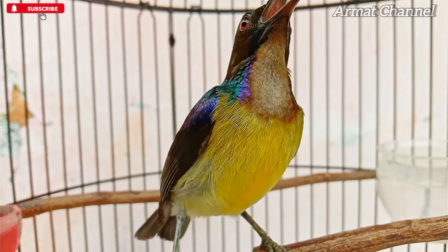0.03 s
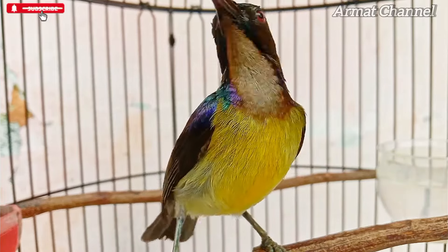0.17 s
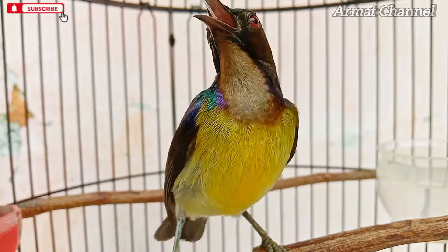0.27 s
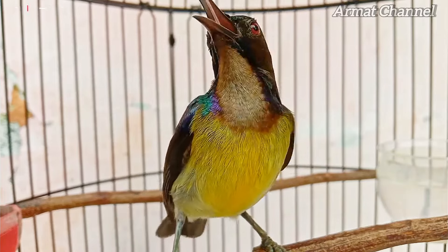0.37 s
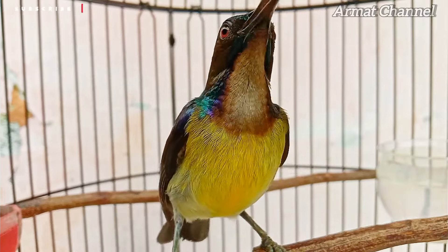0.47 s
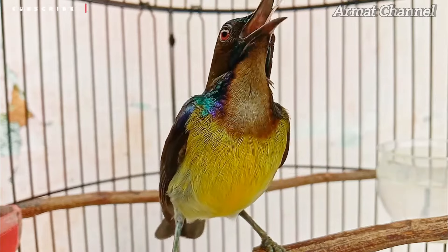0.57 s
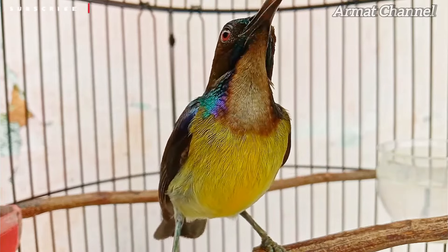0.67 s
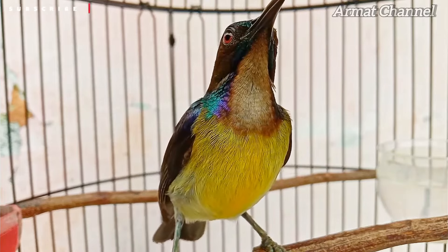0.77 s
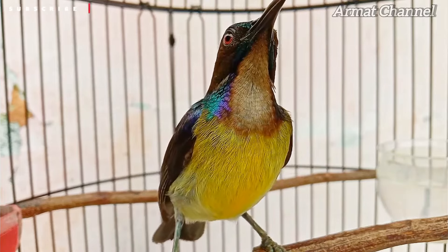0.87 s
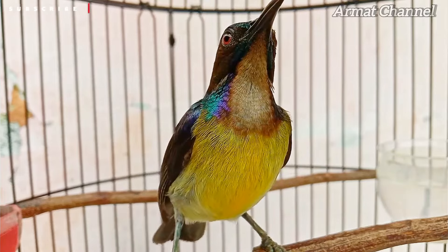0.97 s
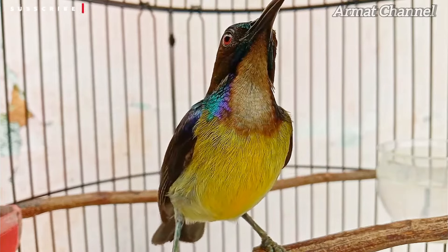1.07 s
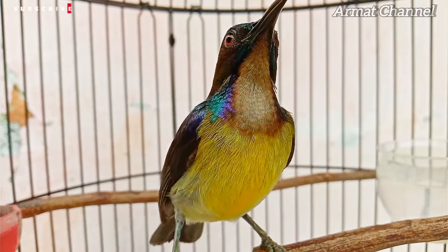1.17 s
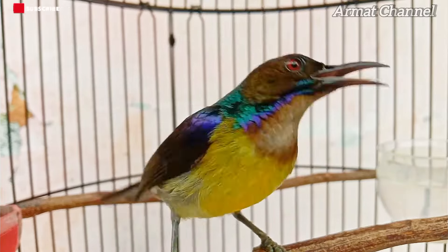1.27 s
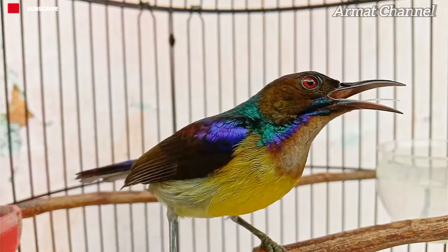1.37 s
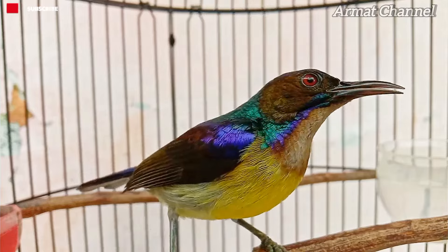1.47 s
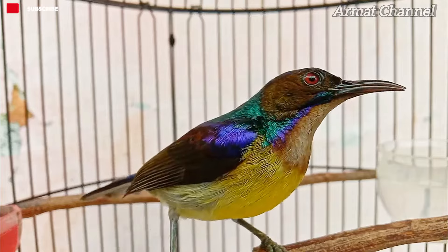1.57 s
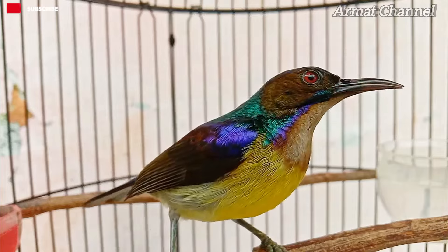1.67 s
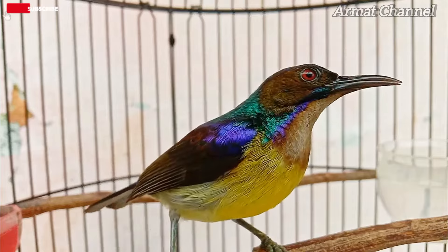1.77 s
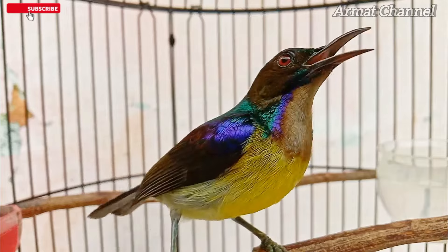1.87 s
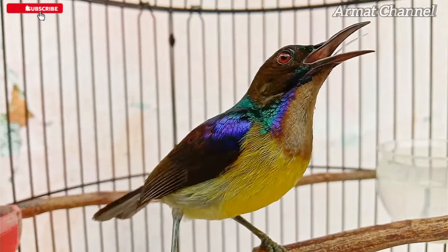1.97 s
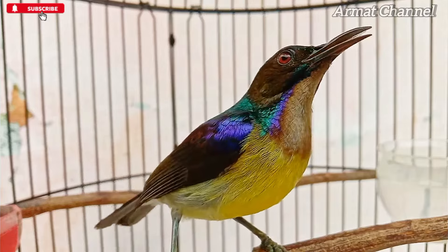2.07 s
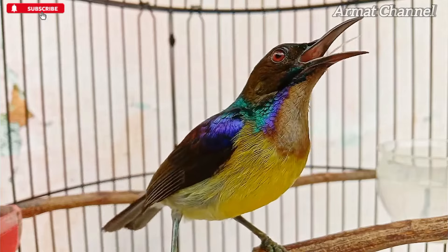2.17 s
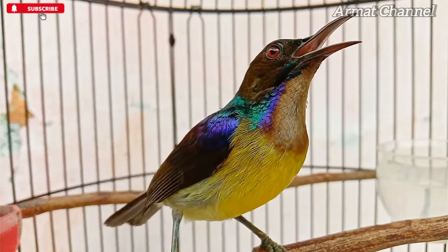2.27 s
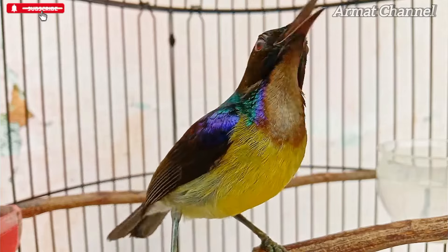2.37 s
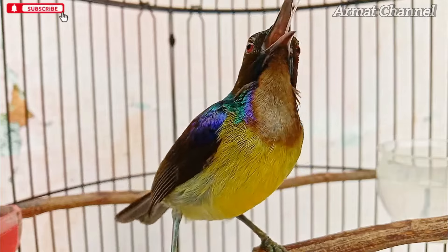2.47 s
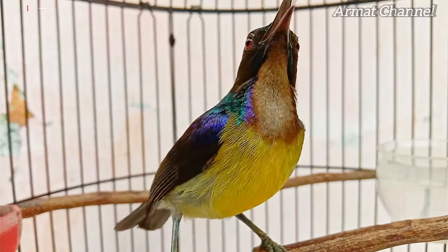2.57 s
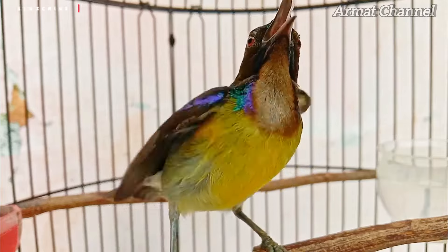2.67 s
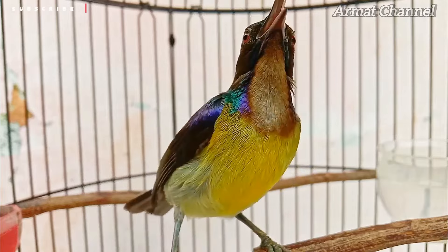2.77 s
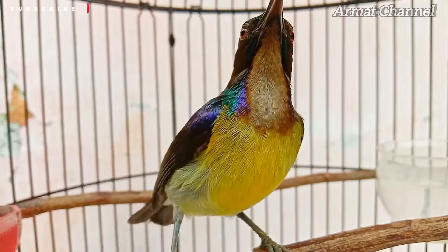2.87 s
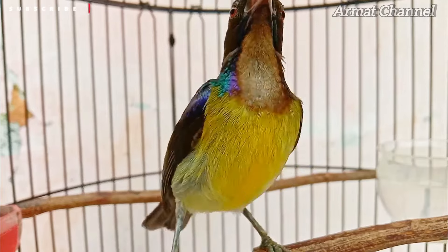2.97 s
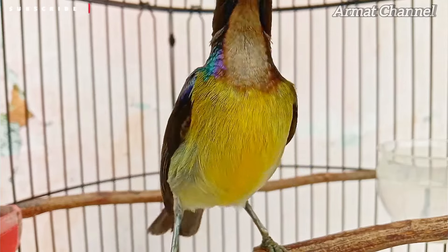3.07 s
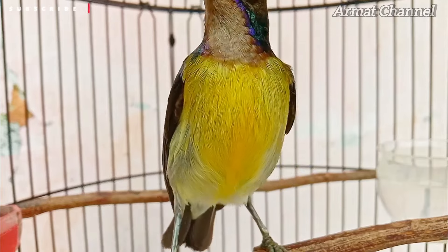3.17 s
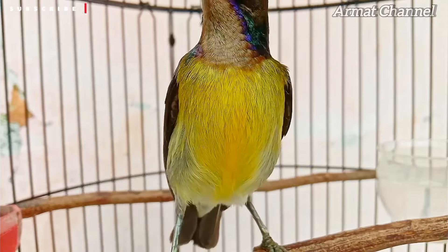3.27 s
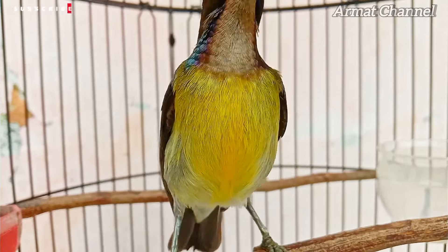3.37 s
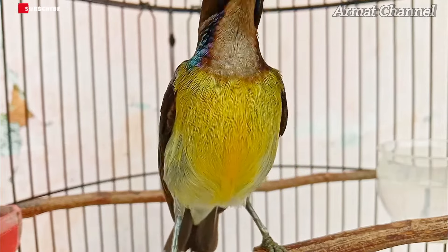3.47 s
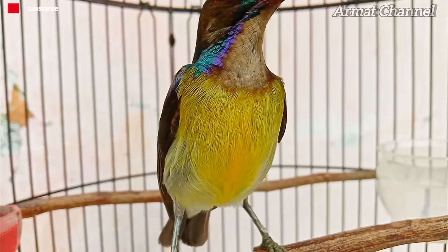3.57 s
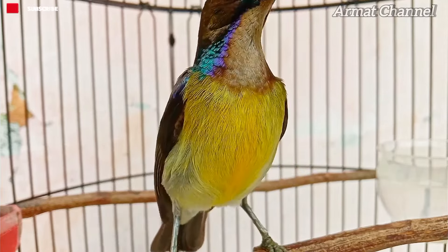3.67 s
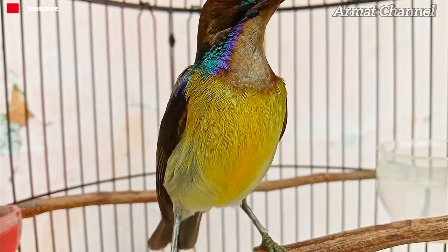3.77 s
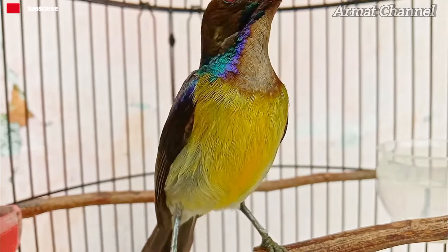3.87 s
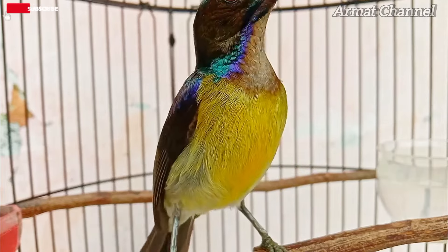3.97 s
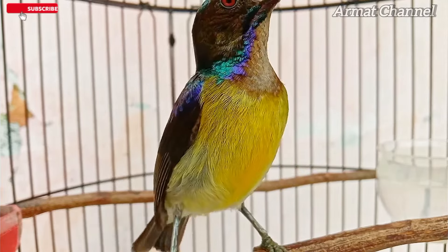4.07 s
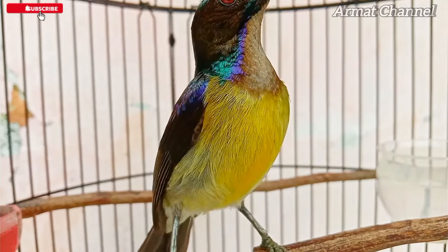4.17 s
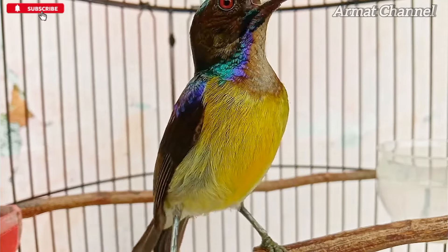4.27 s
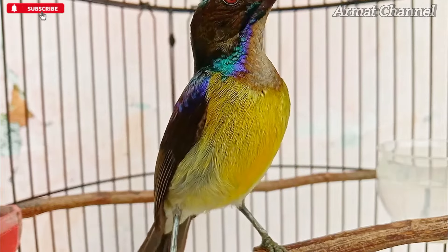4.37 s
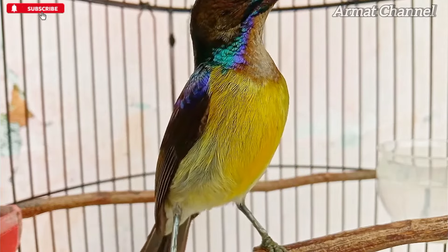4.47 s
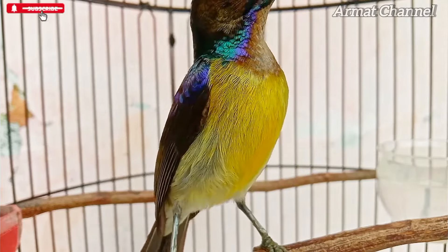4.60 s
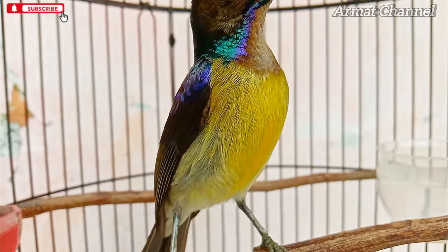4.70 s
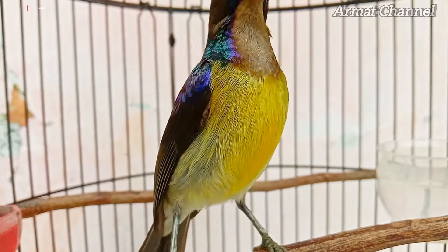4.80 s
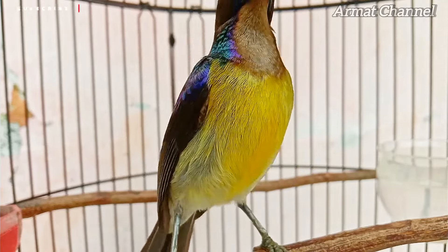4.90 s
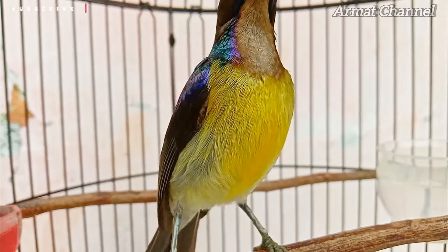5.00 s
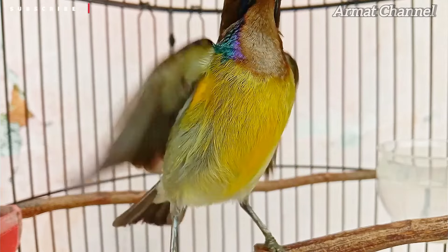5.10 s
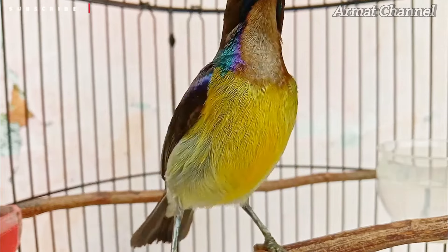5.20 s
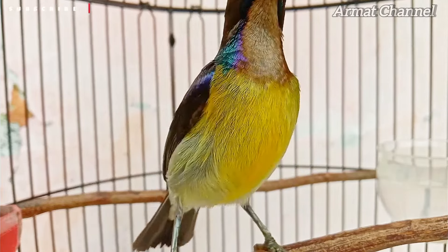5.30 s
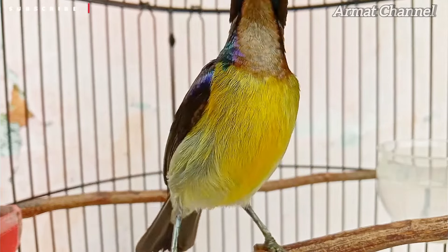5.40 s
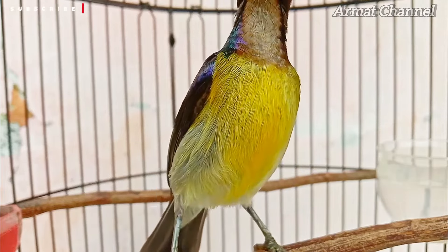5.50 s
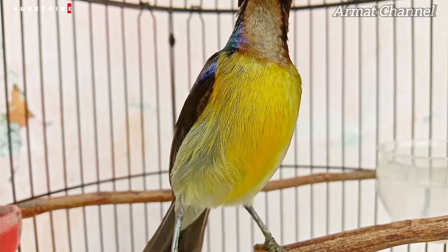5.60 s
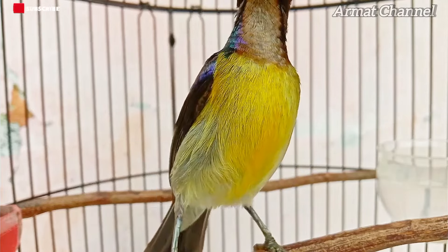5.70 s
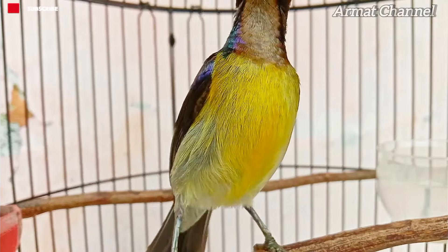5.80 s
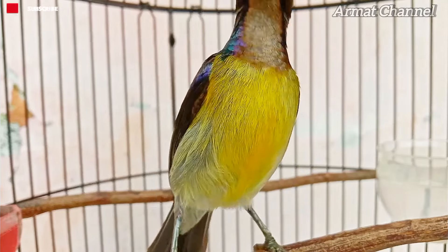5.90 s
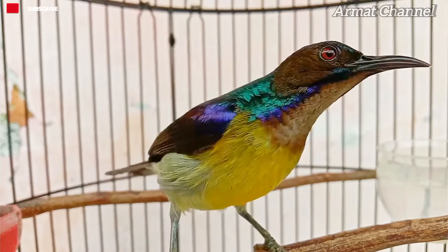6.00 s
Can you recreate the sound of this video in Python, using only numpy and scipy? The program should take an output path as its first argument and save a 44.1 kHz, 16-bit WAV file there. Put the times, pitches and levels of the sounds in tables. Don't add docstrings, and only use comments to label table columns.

```python
import sys
import numpy as np
from scipy import signal
from scipy.io import wavfile
from scipy.ndimage import uniform_filter1d, minimum_filter1d

SR = 44100
rng = np.random.default_rng(int(sys.argv[2]) if len(sys.argv) > 2 else 0)


def to_linear_factor(level_db):
    exponent = np.asarray(level_db, float) / 20
    return 10 ** exponent


def persist_wave(psi):
    counts = np.round(np.clip(psi, -1, 1) * 32767).astype(np.int16)
    wavfile.write(sys.argv[1], SR, np.atleast_2d(counts).T)


N = 266584


def evened(x):
    return x / np.sqrt(np.mean(x ** 2) + 1e-20)


def read(points, hz):
    f, value = np.transpose(points)
    return np.interp(np.log(hz + 1), np.log(f + 1), value)


def add(mix, s, sound):
    at = round(s * SR)
    sound = sound[max(-at, 0):]
    part = mix[max(at, 0):][:len(sound)]
    part += sound[:len(part)]


def colour(x, points):
    gain_db = read(points, abs(np.fft.fftfreq(4096, 1 / SR)))
    log_spectrum = np.conj(signal.hilbert(np.log(to_linear_factor(gain_db))))
    taps = np.fft.ifft(np.exp(log_spectrum)).real[:2048]
    return signal.oaconvolve(x, taps)[:len(x)]


def wander(count, width_s):
    width = max(round(width_s * SR), 1)
    noise = rng.standard_normal(12000 + count // 12000 * 12000)
    smooth = uniform_filter1d(uniform_filter1d(noise, width), width)
    return evened(smooth)[:count]


def stack(hz, levels_db):
    turns = 2 * np.pi * np.cumsum(hz) / SR
    out = 0
    for k, db in enumerate(levels_db, 1):
        out = out + to_linear_factor(db) * np.cos(k * turns) * (k * hz < SR / 2.3)
    return out


def glide(row, levels_db, jitter, taper):
    s, length, from_hz, to_hz, db = row
    hz = np.geomspace(from_hz, to_hz, round(length * SR))
    hz = hz * (1 + jitter * wander(len(hz), 0.0044))
    return s, to_linear_factor(db) * stack(hz, levels_db) * signal.windows.tukey(len(hz), taper)


# time_s, level_db
EFFORT = [(0, -9.5), (1.3, -11.5), (2.3, -11), (2.9, -13), (3.15, -9), (3.6, -13), (4.3, -9.5), (5, -7.5)]


def breath_db(t):
    swell = -15 * np.maximum(1 - (t - t[0]) / .016, 0)
    fade = -13 * np.maximum(1 - (t[-1] - t) / .022, 0)
    flutter = 2 * wander(len(t), .01)
    return np.interp(t, *np.transpose(EFFORT)) + swell + fade + flutter


# time_s, pitch_hz, extra_effort_db
ARCHES = [
    [(0.133, 1125, 10.5), (0.147, 2390, -0.5), (0.169, 2517, -2.5), (0.185, 2864, -8), (0.197, 3066, -4),
     (0.217, 2953, -5.5), (0.271, 2477, -3.5), (0.281, 2285, -7.5), (0.3, 1124, 5)],
    [(0.406, 990, 5), (0.42, 1700, -10), (0.432, 2250, -3.5), (0.453, 2677, -4.5), (0.468, 3125, -2),
     (0.5, 2765, -5), (0.534, 2521, -1), (0.55, 2215, -12), (0.57, 1144, 8)],
    [(1.193, 1134, 18), (1.207, 2070, -8), (1.231, 2450, -4), (1.249, 2670, -1.5), (1.265, 2890, -7.5),
     (1.301, 2560, 2), (1.333, 2237, -2), (1.339, 2090, -6.5), (1.358, 1170, -11)],
    [(1.774, 1133, 12), (1.788, 2303, -7.5), (1.812, 2533, 0.5), (1.824, 2874, -5), (1.842, 2906, -3),
     (1.902, 2510, 0), (1.916, 2360, -9), (1.922, 2330, -1), (1.942, 1150, 3)],
    [(2.033, 1132, 9), (2.047, 2350, -4), (2.075, 2740, -3.5), (2.085, 2920, -2), (2.103, 3173, 0.5),
     (2.145, 2760, -0.5), (2.181, 2583, -3), (2.197, 2307, 2), (2.215, 1080, 4.5)],
    [(2.282, 1136, 18), (2.296, 2260, -9.5), (2.324, 2780, 2), (2.354, 3094, -5), (2.37, 3040, -3),
     (2.4, 2770, -1.5), (2.42, 2680, -3), (2.45, 2334, 2.5), (2.468, 1150, 1.5)],
    [(2.541, 1131, 18.5), (2.555, 2375, -7), (2.58, 2567, -5), (2.601, 2993, 1), (2.616, 3224, -2.5),
     (2.64, 2796, 5.5), (2.685, 2524, 0), (2.697, 2250, 3.5), (2.715, 1104, 6)],
    [(2.811, 1153, 22.5), (2.825, 2363, -5), (2.853, 2664, 4.5), (2.865, 2974, 0.5), (2.893, 3124, -2.5),
     (2.913, 2757, 11.5), (2.943, 2580, 3), (2.967, 2233, 4), (2.985, 1107, 10)],
    [(3.078, 1135, 23.5), (3.092, 2235, -10), (3.122, 2673, -8), (3.14, 3150, -3.5), (3.152, 3202, 0.5),
     (3.176, 2740, -8.5), (3.206, 2448, -1.5), (3.216, 2258, -4.5), (3.235, 1123, -16)],
    [(3.396, 1194, 12.5), (3.41, 2405, -5.5), (3.438, 2710, -3.5), (3.452, 3178, 0.5), (3.47, 3157, 0.5),
     (3.504, 2730, 2), (3.536, 2480, -1), (3.55, 2250, 4), (3.568, 1174, -2.5)],
    [(3.636, 1207, 12), (3.65, 2448, -3), (3.675, 2755, 0), (3.695, 3535, -3), (3.715, 3280, -1.5),
     (3.745, 2794, 0.5), (3.782, 2510, 1.5), (3.794, 2260, 3.5), (3.812, 1204, 5)],
    [(3.886, 1152, 15.5), (3.9, 2460, -3), (3.918, 2660, -2.5), (3.932, 3510, -4.5), (3.946, 3750, 1),
     (3.986, 2787, -3), (4.02, 2520, -2), (4.04, 2195, -5), (4.058, 1100, -3)],]
# time_s, pitch_hz, extra_effort_db
SLURS = [
    [(-.03, 2678, 5), (.015, 2656, -1), (.028, 2480, -2.5), (.038, 2230, -3.5), (.058, 1080, -1)],
    [(4.125, 1270, 16.5), (4.141, 2524, -6.5), (4.156, 2670, -3.5), (4.18, 3890, -4.5), (4.189, 3970, 5),
     (4.211, 3520, -5.5), (4.228, 2270, -3), (4.252, 1096, 3)],
    [(4.438, 1198, 16), (4.462, 2800, -12), (4.475, 4266, -6.5), (4.488, 4843, -2), (4.505, 4330, -1),
     (4.52, 2250, -10), (4.54, 1083, 8.5)],
    [(4.938, 1024, 9), (4.956, 2275, -6), (4.968, 2520, -9.5), (4.98, 4320, -9.5), (4.989, 4650, -3),
     (5.009, 4050, -6), (5.022, 2094, -11), (5.036, 1090, 11)],
]
# time_s, pitch_hz, effort_db
WHISTLES = [
    [(1.754, 2900, 4), (1.759, 3585, -27.5), (1.763, 7800, -7), (1.771, 7420, 0), (1.785, 6240, -21),
     (1.794, 6340, -25), (1.807, 5000, -42)],
    [(4.31, 2310, -19), (4.319, 4370, -19), (4.329, 6930, -5), (4.337, 7180, -6.5), (4.352, 6860, -9),
     (4.364, 5910, -9), (4.368, 4800, -31.5), (4.379, 1470, -6.5)],
    [(4.606, 2200, -22), (4.615, 4370, -27), (4.626, 7550, -6), (4.637, 6520, -14.5), (4.65, 5590, -6),
     (4.689, 5967, -13.5), (4.698, 4520, -51)],
    [(4.79, 2220, -16), (4.799, 4180, -17), (4.806, 6550, -2), (4.815, 6580, -8.5), (4.829, 6920, -7.5),
     (4.838, 6180, -11.5), (4.845, 4780, -36.5), (4.854, 1650, -7.5)],
]


def notes():
    out = []
    labelled = [(rows, False) for rows in ARCHES + SLURS]
    labelled += [(rows, True) for rows in WHISTLES]
    for rows, whistle in labelled:
        s, hz, db = np.transpose(rows)
        t = np.arange(s[0], s[-1], 1 / SR)
        effort_db = np.interp(t, s, db)
        if not whistle:
            effort_db = effort_db + breath_db(t)
        out.append((t, np.interp(t, s, hz), effort_db, whistle))
    return out


OVERTONES_DB = [-1.5, -1.7, -7, -7.5, -4, -6, -13, -18.5, -38, -41.5]
# time_s, depth_db
BEAK_SHADOW = [(0, -2), (2.6, -3), (3, -16), (4.3, -20), (4.45, -2), (5, -2)]


def syrinx(t, hz, effort_db, whistle):
    count, rising, falling = len(t), t < t.mean(), t > t.mean()
    hz = uniform_filter1d(hz, round(.0047 * SR), mode="nearest")
    slack = np.clip(2 - 2 * hz / 2300, 0, 1)
    taut = np.clip(2 * hz / 3650 - 2, 0, 1)
    jitter = (0.0046 + .04 * slack) * wander(count, 0.00085)
    hz = hz * (1 + jitter + .005 * wander(count, .006))
    low = np.clip((2350 - hz) / 350, 0, 1)
    limp = low * falling
    onset = low * rising * (1 - slack)

    upper_db = 5 * wander(count, .004) - 10 * np.maximum(3100 - hz, 0) / 1000
    whistle_db = -20 * whistle * np.clip(5300 / hz * 10 - 10, 0, 1)
    over_db = -8 * taut - 13 * limp + whistle_db
    shadow_db = np.interp(t, *np.transpose(BEAK_SHADOW))
    levels_db = []
    for k, db in enumerate(OVERTONES_DB, 1):
        shaded_db = shadow_db * np.exp(-((k * hz - 9100) / 850) ** 2)
        levels_db.append(db + over_db * (k > 1) + shaded_db + upper_db * (k > 3))

    fray_db = np.clip((2650 - hz) / 200, 0, 1) * falling * (1 - limp) * (7 + 5 * wander(count, .004))
    tight = np.clip((hz - 2700) / 250, 0, 1)
    puffs_db = 4.5 * wander(count, .009) + 9 * onset - 8 * tight - 10 * whistle
    leak_db = -17 + puffs_db + fray_db + 11 * limp * (1 - slack)
    air = to_linear_factor(19 * slack) * rng.standard_normal(count)

    edges = np.minimum(1, np.minimum((t - t[0]) / .014, (t[-1] - t) / .007))
    effort = np.sqrt(2) * to_linear_factor(effort_db) * edges
    return effort * stack(hz, levels_db), effort * to_linear_factor(leak_db) * air, effort * to_linear_factor(-68) * air


# frequency_hz, gain_db
TRACT = [(1000, -25.5), (1600, -37.5), (2500, -29.5), (3500, -22.5), (4300, -11.5), (5000, -11.5),
         (6000, -0.5), (6400, -14.5), (6900, -18.5), (8000, -32), (9000, -35.5), (10500, -38), (13000, -41),
         (15000, -34)]
# frequency_hz, gain_db
CAGE = [(2300, -0.5), (2830, -3.5), (3200, 0), (3700, -0.5), (4400, 2), (5050, 0), (5350, 1), (5800, -0.5)]
# frequency_hz, gain_db
AIR = [(1500, -17), (3000, -6), (4000, 3), (4600, -4), (6500, -4.5), (7500, -1.5), (10000, -7)]
# start_s, length_s, from_hz, to_hz, level_db
RASPS = [
    (4.297, 0.023, 1150, 1950, -11.5),
    (4.593, 0.026, 1100, 2077, -15.5),
    (4.771, 0.028, 1150, 2092, -14.5),
]
# start_s, level_db
TICKS = [(.126, -50), (.399, -42), (1.188, -40), (2.028, -36), (2.536, -52), (2.805, -48), (3.072, -52),
         (3.627, -44), (4.118, -52), (4.432, -46), (4.768, -48), (4.932, -46)]
# frequency_hz, gain_db
WIRES = [(530, -22.5), (900, -33), (1180, 14), (1470, 6.5), (1950, 3), (3180, 5.5), (5120, 9),
         (11000, -11.5), (15500, -10.5)]


def bird():
    voice, breath, hiss, ticks = np.zeros((4, N))
    for t, hz, effort_db, whistle in notes():
        tone, leak, beak = syrinx(t, hz, effort_db, whistle)
        add(voice, t[0], tone)
        add(breath, t[0], leak)
        add(hiss, t[0], beak)
    for s, db in TICKS:
        add(ticks, s, to_linear_factor(db) * rng.standard_normal(30) * np.hanning(30))
    for row in RASPS:
        s, rasp = glide(row, OVERTONES_DB, .05, .9)
        add(breath, s, rasp * (1 + .85 * rng.standard_normal(len(rasp))))
        add(hiss, s, rasp * to_linear_factor(-46) * rng.standard_normal(len(rasp)))
    hiss = signal.lfilter(*signal.butter(3, 7500, "high", fs=SR), hiss)
    ticks = signal.lfilter(*signal.butter(3, 7000, fs=SR), ticks)
    sung = colour(colour(voice, CAGE) + colour(breath, AIR), TRACT)
    return to_linear_factor(10) * (sung + hiss + colour(ticks, WIRES))


# start_s, tick_db, thump_db
PERCH = [(0.3374, -43.5, -51), (0.3644, -47.5, -45), (0.7553, -56.5, -53), (0.807, -56, -54),
         (1.3, -42, -50), (1.499, -51.5, -44), (1.6442, -60.5, -67), (1.666, -52, -39), (1.675, -45.5, -58),
         (1.69, -45.5, -55), (1.7203, -40.5, -38.5), (1.7392, -54, -52), (2.4233, -53, -42),
         (2.4511, -52, -41), (3.138, -32, -33), (3.261, -41.5, -41), (3.27, -44, -34.5), (3.296, -51, -47),
         (3.322, -36.5, -37), (3.3593, -39, -41.5), (3.382, -39, -64), (3.4567, -42, -39),
         (3.5322, -42.5, -42), (5.219, -49.5, -50), (5.25, -51, -43.5), (5.2765, -47.5, -54),
         (5.306, -45.5, -40.5), (5.4653, -59, -52), (5.4844, -58.5, -50), (5.621, -58, -65)]


def perch():
    ticks, thumps, t = np.zeros(N), np.zeros(N), np.arange(3500) / SR
    tick_shape = np.minimum(t / 0.0016, 1) * (to_linear_factor(-60 * t / 0.023) + to_linear_factor(-20.5 - 60 * t / 0.3))
    thump_shape = np.minimum(t / .004, 1) * to_linear_factor(-60 * t / .09)
    for s, tick_db, thump_db in PERCH:
        add(ticks, s, to_linear_factor(tick_db + 5.5) * rng.standard_normal(len(t)) * tick_shape)
        add(thumps, s, to_linear_factor(thump_db + 11) * rng.standard_normal(len(t)) * thump_shape)
    thumps = signal.lfilter(*signal.butter(2, [110, 700], "band", fs=SR), thumps)
    return colour(ticks, WIRES) + thumps


# start_s, length_s, level_db
RUSTLES = [(0.289, 0.041, -55), (0.745, 0.09, -65.5), (1.468, 0.067, -65), (1.649, 0.16, -56.5),
           (2.406, 0.062, -43), (2.763, 0.049, -47.5), (3.096, 0.063, -52.5), (3.152, 0.18, -49.5),
           (3.473, .12, -68), (5.189, 0.12, -83), (5.48, 0.092, -85), (5.595, 0.043, -69.5)]


def feathers():
    out = np.zeros(N)
    for s, length, db in RUSTLES:
        count = round(length * SR)
        clumps = to_linear_factor(db + 3.04 * wander(count, 0.0016))
        add(out, s, clumps * rng.standard_normal(count) * signal.windows.tukey(count, .4))
    body = signal.lfilter(*signal.butter(2, [120, 900], "band", fs=SR), out)
    return colour(out, WIRES) + to_linear_factor(5.5) * body


# frequency_hz, t60_s
ROOM_T60 = [(1000, 0.33), (3500, 0.48), (4500, 0.32), (6000, 0.28), (9000, 0.18), (14000, 0.24)]


def room(x):
    taps = np.zeros(SR)
    at = np.arange(500, SR - 20, 20)
    taps[at + rng.integers(0, 20, len(at))] = rng.choice([-1., 1.], len(at))
    hz, t, z = signal.stft(taps, SR, nperseg=256)
    decay = to_linear_factor(-60 * t / read(ROOM_T60, hz)[:, None])
    tail = signal.istft(z * decay, SR, nperseg=256)[1]
    return signal.fftconvolve(x, tail / np.linalg.norm(tail))[:N]


# start_s, length_s, from_hz, to_hz, level_db
CROWS = [(0.618, 0.084, 804, 780, -59), (0.77, 0.091, 649, 616, -62.5), (0.882, 0.23, 642, 627, -59.5),
         (1.093, 0.058, 617, 632, -73), (4.381, 0.26, 347.3, 376, -60), (4.671, 0.17, 377.5, 355, -62.5),
         (4.837, 0.29, 322, 335, -67), (5.01, 0.1, 633, 620, -64), (5.27, 0.25, 610, 665, -60),
         (5.467, 0.2, 626, 645, -62.5), (5.076, 0.091, 726, 767, -53.5), (5.731, 0.23, 630, 619, -68),
         (5.571, 0.19, 746, 745, -54), (5.801, 0.2, 740, 753, -62.5), (5.94, 0.14, 730, 741, -58),
         (5.868, 0.16, 599, 601.4, -68)]
# frequency_hz, gain_db
CROW_THROAT = [(300, 13), (700, -6.5), (1250, 3), (1900, -32), (2500, -19), (5000, -31), (7000, -33)]
# start_s, length_s, from_hz, to_hz, level_db
FAR_BIRDS = [(1.578, .02, 4450, 4100, -57), (1.593, .012, 4000, 3100, -59), (1.6, .04, 3150, 3000, -63),
             (1.615, .012, 3200, 4300, -63), (1.645, .035, 5900, 3000, -60), (1.685, .02, 4700, 3900, -54),
             (5.19, .042, 5350, 4650, -46), (5.225, .04, 4700, 4500, -51), (5.855, .015, 6000, 4800, -64),
             (5.868, .036, 4900, 2450, -55), (5.91, .05, 4700, 4500, -67), (5.9, .016, 2400, 2200, -59),
             (5.8, .014, 5000, 3100, -68), (5.9, .028, 4850, 3950, -52), (5.818, .03, 4600, 4450, -62),
             (1.02, .17, 4150, 4300, -68), (.94, .25, 4850, 5050, -67), (1.03, .15, 4500, 4600, -71),
             (.97, .2, 5500, 5600, -76), (.89, .17, 1268, 1240, -61), (5.3, .3, 1255, 1240, -63),
             (1.0, .17, 6850, 6800, -78), (5.55, .25, 2950, 2900, -72), (1.0, .12, 3100, 3200, -73),
             (1.04, .15, 3850, 3950, -72), (5.93, .06, 410, 400, -54), (.96, .08, 2450, 2480, -72),
             (5.82, .03, 2500, 3400, -63), (4.68, .16, 765, 725, -57), (.88, .1, 2950, 2900, -76),
             (5.35, .3, 1900, 1910, -71), (5.7, .12, 1880, 1860, -72), (5.95, .09, 1830, 1820, -68),
             (5.6, .2, 1520, 1490, -66)]


def far_animals():
    out = np.zeros(N)
    for row in CROWS:
        throat_db = read(CROW_THROAT, row[2] * np.arange(1, 11))
        add(out, *glide(row, throat_db, .014, .6))
    for row in FAR_BIRDS:
        s, whistle = glide(row, [0], .012, .35)
        blur = .6 * row[2] / 4500 * wander(len(whistle), .002)
        add(out, s, whistle * (1 + blur))
    return out


# frequency_hz, width_hz, level_db
DRONE = [(245, 8, -65), (265, 8.3, -66), (289, 14, -63.5), (335, 16, -69)]


def drone():
    start_s, end_s = .56, 1.66
    count = round((end_s - start_s) * SR)
    out, t = np.zeros(N), np.arange(count) / SR
    for hz, width, db in DRONE:
        a, b = wander(count, .5 / width), wander(count, .5 / width)
        line = a * np.cos(2 * np.pi * hz * t) + b * np.sin(2 * np.pi * hz * t)
        add(out, start_s, to_linear_factor(db) * line * signal.windows.tukey(count, .15))
    return out


# frequency_hz, level_db per Hz
YARD = [(100, -24.5), (200, -21), (280, 7.5), (450, -13), (700, -9.5), (1150, -12), (1250, 6.5),
        (1370, -10.5), (2100, -15.5), (4000, -26.5), (7000, -26), (9000, -47)]
# time_s, engine_wash_db, distant_yard_db
YARD_LEVEL = [(0, -55, -55), (.5, -59.5, -62.5), (.8, -67.5, -78), (1, -72, -71), (1.151, -56.5, -67.5),
              (1.55, -57.5, -64.5), (1.8, -63, -65.5), (2.7, -56, -54.5), (3.3, -51.5, -66),
              (3.7, -56.5, -54), (4.4, -57, -78), (4.901, -66.5, -58), (5.151, -66.5, -59),
              (5.6, -72, -63.5), (6.04, -62, -63)]


def yard():
    frames, hz = N // 128 + 5, np.fft.rfftfreq(512, 1 / SR)
    a, b, patches = rng.standard_normal((3, len(hz), frames))
    patches = evened(uniform_filter1d(uniform_filter1d(patches, 4, 0), 24, 1))
    s, *levels_db = np.transpose(YARD_LEVEL)
    t = np.arange(frames) * 128 / SR
    wash_db, distant_db = [np.interp(t, s, db) for db in levels_db]
    swell_db = np.where(hz[:, None] > 470, distant_db, wash_db)
    field_db = read(YARD, hz)[:, None] + 2.2 * patches + swell_db
    return signal.istft((a + 1j * b) * to_linear_factor(field_db - 3), nperseg=512, noverlap=384)[1][:N]


# time_s, level_db
SHAKES = [(.15, -50.5), (.34, -47.5), (.5, -50.5), (1.302, -51.5), (1.73, -43), (2.12, -47.5),
          (2.27, -49.5), (2.519, -50.5), (2.779, -47), (2.9, -41.5), (3.092, -39), (3.19, -46), (3.28, -40),
          (3.42, -52), (3.52, -38.5), (3.62, -44.5), (3.871, -47), (3.97, -54), (4.288, -49), (4.42, -44.5),
          (4.52, -52), (4.76, -49.5), (5.25, -49)]


def rumble(duck):
    hum_hz, width_hz, bob_s = 104.2, 20, .045
    r = np.exp(-np.pi * width_hz / SR)
    resonance = [1, -2 * r * np.cos(2 * np.pi * hum_hz / SR), r * r]
    hum = signal.lfilter([1, -1], resonance, rng.standard_normal(N))
    hum = signal.lfilter(*signal.butter(2, 160, fs=SR), hum)
    band = signal.butter(2, [55, 150], "band", fs=SR, output="sos")
    shake = signal.sosfilt(band, rng.standard_normal(N))

    t = np.arange(N) / SR
    late_duck = np.interp(t - .02, t, duck) ** 1.5
    power = (to_linear_factor(-49 - t) * late_duck) ** 2
    swell = np.exp(-(np.arange(-3 * bob_s, 3 * bob_s, 1 / SR) / bob_s) ** 2)
    for s, db in SHAKES:
        add(power, s - 3 * bob_s, to_linear_factor(db) ** 2 * swell)
    return evened(evened(shake) + to_linear_factor(6.5) * evened(hum)) * np.sqrt(power)


def suppression(song):
    loud = uniform_filter1d(song ** 2, 400) > to_linear_factor(-34) ** 2
    return to_linear_factor(-13 * uniform_filter1d(loud * 1., round(.05 * SR)))


# frequency_hz, gain_db
ROOM_COLOUR = [(1500, -4.5), (3000, -6.5), (4000, -3), (4700, 3.5), (6300, 0.5), (7500, 2)]
# delay_s, level_db
ECHOES = [(.0011, -16), (.0027, -22), (.0046, -22), (.0073, -15), (0.011, -19), (0.016, -24.5),
          (.021, -46.5), (0.028, -30.5)]


def scene():
    song, far = bird(), far_animals()
    near = song + perch() + feathers()
    duck = suppression(song)
    stir = 1 + 1.8 * wander(N, .0022)
    out = near + rumble(duck) + room(to_linear_factor(-25) * colour(near, ROOM_COLOUR) * stir)
    for s, db in ECHOES:
        add(out, s, to_linear_factor(db) * near)
    background = yard() + drone() + far + to_linear_factor(-4) * room(far)
    return (out + background * duck)[None]


# frequency_hz, gain_db
MICROPHONE = [(25, -12), (60, 2), (13200, 2.3), (14800, 5), (15500, 1)]


def low_pass(x):
    return signal.sosfilt(signal.butter(12, 16810, fs=SR, output="sos"), x)


def record(dry):
    power_db = 10 * np.log10(abs(uniform_filter1d(dry[0] ** 2, 300)) + 1e-12)
    fall = np.arange(N) * 127 / SR
    held_db = np.maximum.accumulate(power_db + fall) - fall
    over_db = np.maximum(held_db + 20.5, 0)
    levelled = colour(dry[0], MICROPHONE) / to_linear_factor(0.6 * uniform_filter1d(over_db, 200))
    peak = uniform_filter1d(-minimum_filter1d(-abs(levelled), size=41), size=41)
    limited = levelled / np.maximum(peak / to_linear_factor(-7.4), 1)
    edge = signal.firwin(255, 15600, window=("kaiser", 4), fs=SR)
    return low_pass(signal.oaconvolve(limited, edge, "same")[None])


dry = scene()
out = record(dry)
persist_wave(out)
```